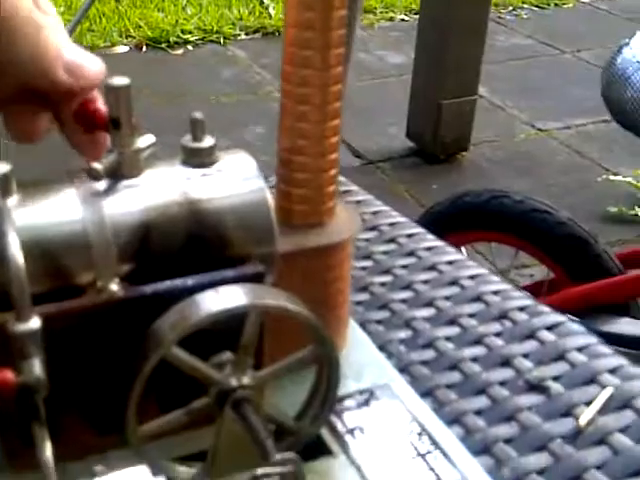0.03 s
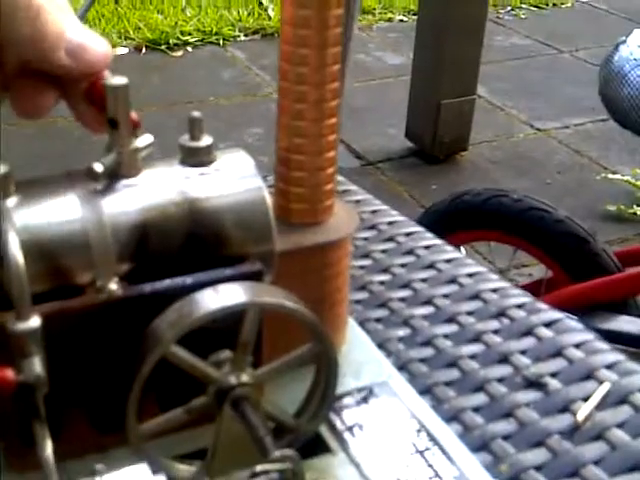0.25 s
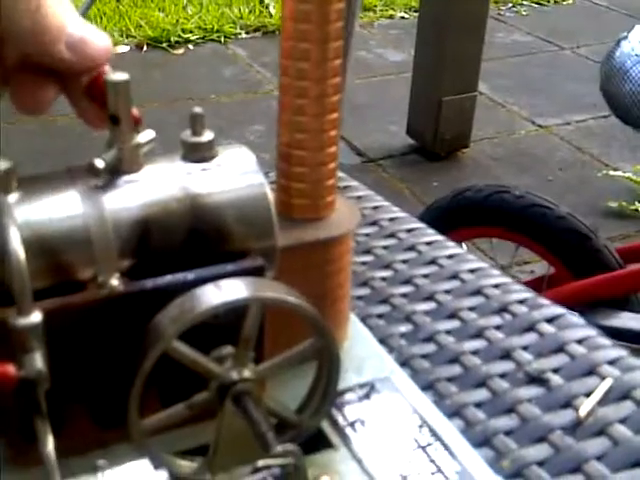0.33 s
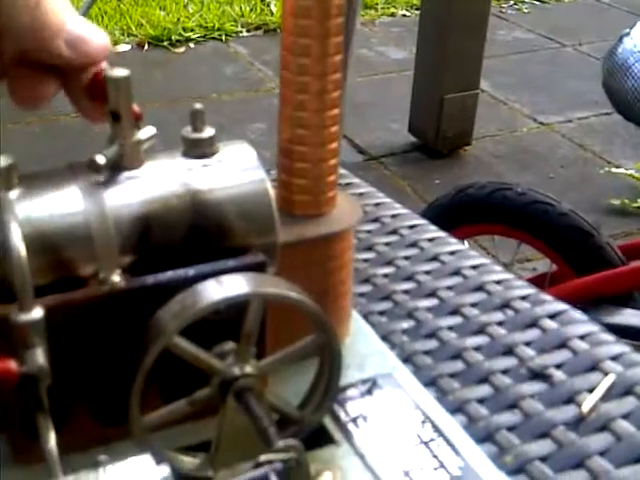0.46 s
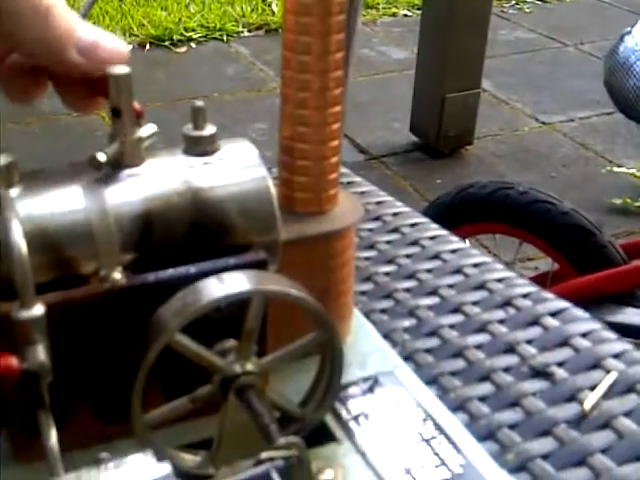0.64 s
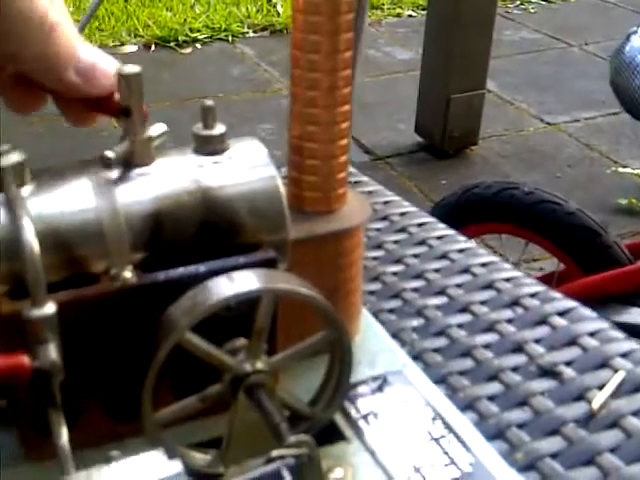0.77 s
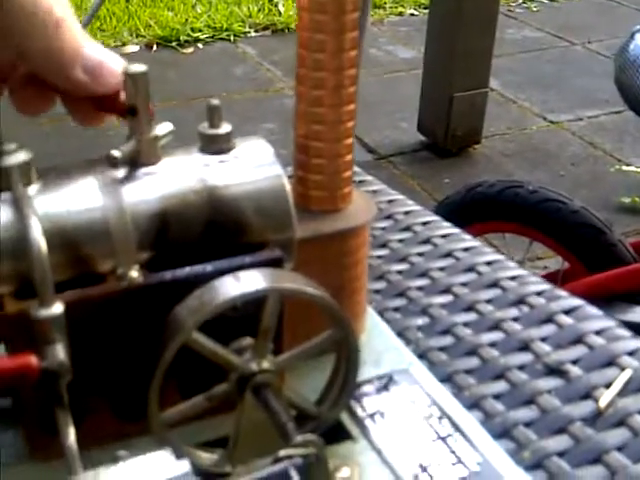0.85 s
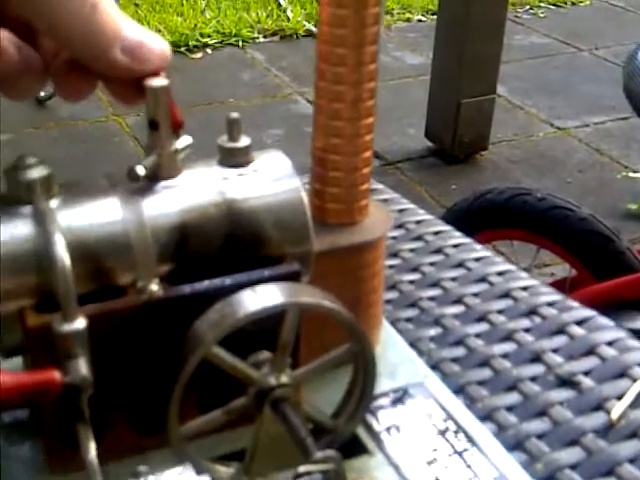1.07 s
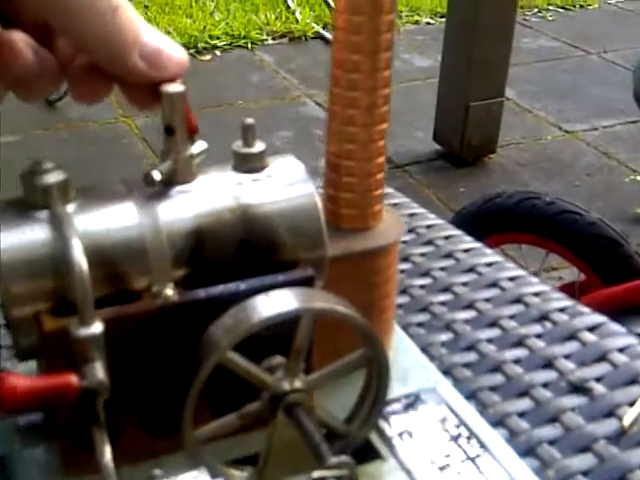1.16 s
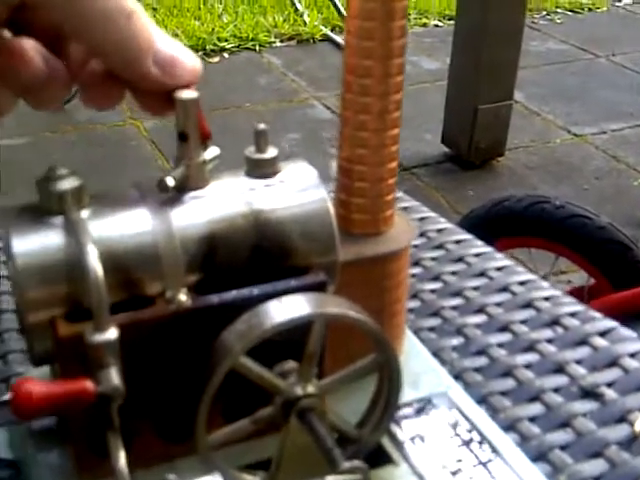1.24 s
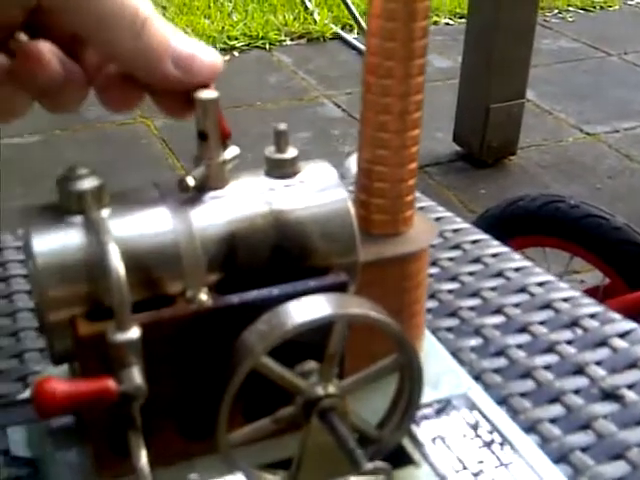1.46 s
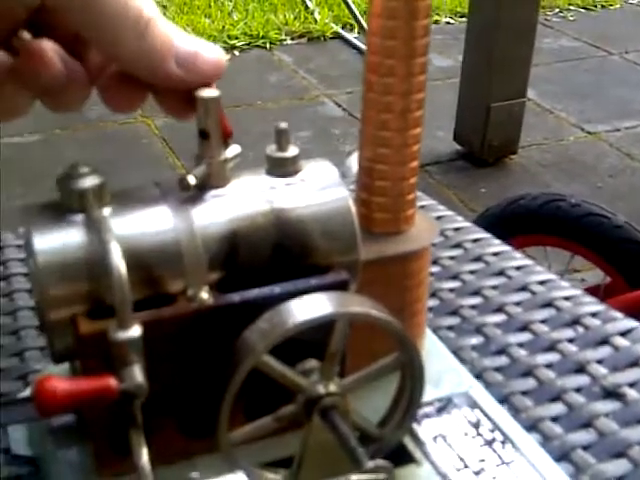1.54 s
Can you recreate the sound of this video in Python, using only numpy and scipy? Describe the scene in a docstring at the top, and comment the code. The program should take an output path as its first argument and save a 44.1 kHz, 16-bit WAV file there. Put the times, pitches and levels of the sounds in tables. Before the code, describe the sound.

A small steam whistle close by outdoors: a very high, wavering shriek slides up, holds and sags off; after a short quiet gap, a tiny rising chirp breaks into a steady hiss of steam to the end.

```python
"""A quiet garden murmurs first; then, close by on a paved patio, a hand twice opens a model steam whistle's valve.
The first blast slides up to a shrill, wavering note and sags as the valve shuts; a faint bird chirp follows.
The second valve opening is too far: the note chirps up, breaks and leaves a rush of steam to the end.
The note is a sine of moving pitch; steam, puffs and air are filtered noise; the chirp is a wavering sine.
Two wall reflections and decaying noise tails, convolved with the whistle, give the echoes."""
import sys
import numpy as np
from scipy import signal
from scipy.fft import rfft, irfft, next_fast_len
from scipy.io import wavfile
from scipy.ndimage import map_coordinates

SR = 44100
rng = np.random.default_rng(int(sys.argv[2]) if len(sys.argv) > 2 else 0)


def generate_wav(sig):
    """Save sig (samples, or channels by samples) to the path in sys.argv[1] as 16-bit PCM at SR."""
    pcm = np.round(np.clip(np.atleast_2d(sig).T, -1, 1) * 32767).astype(np.int16)
    wavfile.write(sys.argv[1], SR, pcm)


N = 70560
T = np.arange(N) / SR

# Spectrum of the outdoor air: f/Hz, relative level/dB
AIR_SPECTRUM = [(20, -13.5), (45, -8), (95, -0.5), (160, -4.5), (320, -4), (480, -9), (900, -11),
                (1100, -12), (1600, -16.5), (2300, -23), (3800, -21), (4700, -28), (5500, -22),
                (6200, -18.5), (7000, -36), (7600, -47.5)]
# First reflections from the walls: delay t/s, level/dB
WALL_REFLECTIONS = [(.0068, -21.5), (.0125, -18)]
# Diffuse echoes of nearby furniture, then of the walls: level/dB before the body lift,
# 60 dB decay time t/s, build-up t/s
DIFFUSE_ECHOES = [(-19, 0.12, .008), (-22, 0.45, 0.006)]
# Soft puffs as the valve moves: centre t/s, peak level/dB, Gaussian length t/s, top f/Hz
VALVE_PUFFS = [(0.242, -55, 0.02, 400), (.298, -59.5, 0.023, 170), (0.746, -56.5, 0.0071, 201),
               (0.798, -59, 0.0098, 330), (1.086, -51, 0.0074, 580)]
# Valve openings: open t/s, shut t/s, hiss level/dB, roar level/dB, swell of hiss and pipe in dB/s,
# pipe resonance f/Hz, its width f/Hz, its level/dB
VALVE_OPENINGS = [(0.198, 0.812, -43, -60, -1, 5510, 600, -40),
                  (1.06, 1.7, -39, -51.5, 4, 6510, 152.3, -43)]
# Spectrum of the jet's hiss: f/Hz, relative level/dB
HISS_SPECTRUM = [(1800, -30), (2400, -24), (2850, -10.5), (3350, -2), (3750, -5.5), (4180, 1.5),
                 (4500, -7.5), (4900, -3), (5750, -1.5), (6100, -3.5), (6550, 0), (6900, -8), (7300, -15.5),
                 (7600, -25.5)]
# Spectrum of the jet's roar: f/Hz, relative level/dB
ROAR_SPECTRUM = [(200, -31), (480, -15), (640, -4.5), (770, -4.5), (860, -10), (1020, -1.5), (1170, -1.5),
                 (1260, -5.5), (1420, -0.5), (1540, 3), (1640, -5.5), (1850, -13), (2400, -17), (3500, -38)]
# The tone of the first blast, then of the second until it breaks: t/s, f/Hz, level/dB
HELD_TONE = [(0.2, 4490, -33.5), (0.204, 5056, -20), (0.213, 5518, -18.5), (0.224, 5821, -17),
             (0.237, 6050, -11.5), (0.246, 6090, -17.5), (0.262, 5974, -12.5), (0.288, 5996, -14),
             (0.297, 6069, -21.4), (0.307, 6044, -10), (0.322, 6006, -15), (0.341, 5933, -22),
             (0.353, 5950, -13.5), (0.385, 6022, -15), (0.426, 5996, -13.5), (0.446, 5958, -11.5),
             (0.456, 5930, -23), (0.487, 5976, -11.5), (0.501, 5944, -18.5), (0.53, 5977, -12),
             (0.56, 5902, -20.9), (0.575, 5873, -15.5), (0.625, 5909, -19), (0.709, 5970, -15.5),
             (0.735, 5990, -13), (0.772, 5996, -15.5), (0.787, 5867, -20.5), (0.803, 5730, -11.5),
             (0.813, 5440, -17), (0.82, 5180, -18.5), (0.827, 4460, -40)]
BROKEN_TONE = [(1.063, 4750, -33.5), (1.067, 5330, -16.5), (1.074, 5740, -12.5), (1.079, 5920, -21),
               (1.082, 6230, -15.5), (1.09, 6560, -21), (1.096, 6700, -32), (1.11, 6710, -35),
               (1.122, 6700, -39.5)]

AIR_DB = -60.5
BIRD_S, BIRD_LENGTH_S, BIRD_HZ, BIRD_PEAK_DB = .972, .07, 2810, -69  # time of mid-chirp, then length
ECHO_BODY_DB, ECHO_BODY_HZ = 3.5, 1800  # the echo is fuller below this frequency
OPEN_S, SHUT_S = .012, .0087  # time constants of the flow
ROAR_EXPONENT = 3.5  # the roar's amplitude grows as this power of the flow
LEAK_S, LEAK_DB = .0089, -10  # lead of the leak before opening; its level relative to full flow
TONE_EDGE_S = .003
JITTER_HZ, JITTER_PER_S = 14, 440  # turbulence shakes the pitch
FLUTTER_DB, FLUTTER_PER_S = .47, 220  # and the level
BAND_LIMIT_HZ = 7540


def amp(db):
    """Level and amplitude are related logarithmically: 20 dB is a factor of ten."""
    return 10 ** (np.asarray(db) / 20)


def unit(x):
    """Dividing by the root mean square gives a signal unit effective amplitude."""
    return x / np.sqrt(np.mean(x ** 2) + 1e-20)


def along(points, hz):
    """A spectrum envelope is interpolated between (f/Hz, value) points on a log frequency axis."""
    f, v = np.transpose(points)
    return np.interp(np.log(hz + 1), np.log(f + 1), v)


def wobble(rate):
    """A smooth random fluctuation is a spline through independent knots, rate knots a second."""
    knots = rng.standard_normal(int(N * rate / SR) + 4)
    return map_coordinates(knots, [T * rate])


def filtered(x, response):
    """Linear filtering multiplies the spectrum by a response of frequency."""
    m = next_fast_len(N + SR // 2)
    spectrum = rfft(x, m) * response(np.fft.rfftfreq(m, 1 / SR))
    return irfft(spectrum, m)[:N]


def noise(response):
    """White noise shaped by a frequency response becomes coloured noise, here of rms 1."""
    return unit(filtered(rng.standard_normal(N), response))


def outdoor_air(drift_db=1):
    """Ambient noise: a broadband murmur of steady colour and slowly drifting level."""
    murmur = noise(lambda hz: amp(along(AIR_SPECTRUM, hz)))
    return amp(AIR_DB + drift_db * wobble(5.5)) * murmur


def bird_chirp(waver_hz=45, flicker_db=3):
    """Frequency modulation: one faint, far tone wavers in pitch under a rounded envelope."""
    envelope = np.sqrt(np.clip(1 - (2 * (T - BIRD_S) / BIRD_LENGTH_S) ** 2, 0, 1))
    pitch = BIRD_HZ + waver_hz * wobble(200)
    tone = np.sin(2 * np.pi * np.cumsum(pitch) / SR)
    return amp(BIRD_PEAK_DB + flicker_db * wobble(100)) * envelope * tone


def patio(x):
    """Reflection and reverberation: discrete wall echoes and diffuse tails form an impulse response."""
    t = T[:SR]
    impulse_response = np.zeros(SR)
    for db, t60, build_s in DIFFUSE_ECHOES:
        build_up = np.clip(t / build_s - 1, 0, 1)  # silent for build_s, then rising over build_s
        tail = rng.standard_normal(SR) * amp(-60 * t / t60) * build_up
        impulse_response += amp(db) * tail / np.linalg.norm(tail)
    for delay, db in WALL_REFLECTIONS:
        impulse_response[round(delay * SR)] += amp(db)
    echo = signal.fftconvolve(x, impulse_response)[:N]
    return x + filtered(echo, lambda hz: amp(ECHO_BODY_DB / (1 + (hz / ECHO_BODY_HZ) ** 4)))


def valve_puffs(bottom_hz=60):
    """Transient flow: low, soft noise bursts with Gaussian envelopes as the valve opens and shuts."""
    out = np.zeros(N)
    for s, db, length, top_hz in VALVE_PUFFS:
        body = noise(lambda hz: hz / (hz + bottom_hz) / (1 + (hz / top_hz) ** 4))
        envelope = np.exp(-.5 * ((T - s) / length) ** 2)
        out += amp(db) * envelope * body
    return out


def valve_flow(start, shut):
    """First-order relaxation: after a small leak the flow rises, and later decays, exponentially."""
    age = np.maximum(T - start, 0)
    leak = amp(LEAK_DB) * np.clip(2 * (T - start + LEAK_S) / LEAK_S, 0, 1)
    opening = np.maximum(1 - np.exp(-age / OPEN_S), leak)
    return opening * np.exp(-np.maximum(T - shut, 0) / SHUT_S)


def steam_jet(unsteady_db=.45, pipe_flutter_db=2):
    """Jet noise and resonance: the open jet hisses, roars at full flow and rings the pipe."""
    out = np.zeros(N)
    for start, shut, hiss_db, roar_db, swell_db, pipe_hz, width_hz, pipe_db in VALVE_OPENINGS:
        flow = valve_flow(start, shut)
        swell = amp(swell_db * np.maximum(T - start, 0))
        hiss = noise(lambda hz: amp(along(HISS_SPECTRUM, hz)))
        hiss *= amp(hiss_db + unsteady_db * wobble(45))
        roar = amp(roar_db) * noise(lambda hz: amp(along(ROAR_SPECTRUM, hz)))
        pipe = noise(lambda hz: 1 / (1 + 2 * ((hz - pipe_hz) / width_hz) ** 2))
        pipe *= amp(pipe_db + pipe_flutter_db * wobble(70))
        out += flow * swell * (hiss + pipe) + flow ** ROAR_EXPONENT * roar
    return out


def pipe_tone(rows):
    """Jet-driven oscillation: the pipe sounds a single tone, shaken slightly by its turbulent jet."""
    s, hz, db = np.transpose(rows)
    pitch = np.interp(T, s, hz) + JITTER_HZ * wobble(JITTER_PER_S)
    to_nearest_end = np.minimum(T - s[0], s[-1] - T)
    gate = np.sin(np.pi / 2 * np.clip(to_nearest_end / TONE_EDGE_S + .5, 0, 1)) ** 2
    level = amp(np.interp(T, s, db) + FLUTTER_DB * wobble(FLUTTER_PER_S))
    sine = np.sqrt(2) * np.sin(2 * np.pi * np.cumsum(pitch) / SR)  # rms 1
    return gate * level * sine


def scene():
    """Superposition: the whistle with its echoes adds to the garden's air and chirp."""
    background = outdoor_air() + bird_chirp()
    whistle = valve_puffs() + steam_jet() + pipe_tone(HELD_TONE) + pipe_tone(BROKEN_TONE)
    return (background + patio(whistle))[None]


def record(dry):
    """Band limitation: a 200 Hz wide slope centred on the limit removes all higher frequencies."""
    return filtered(dry[0], lambda hz: np.clip((BAND_LIMIT_HZ - hz) / 200 + .5, 0, 1))[None]


dry = scene()
out = record(dry)
generate_wav(out)
```